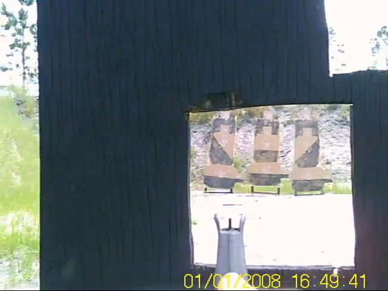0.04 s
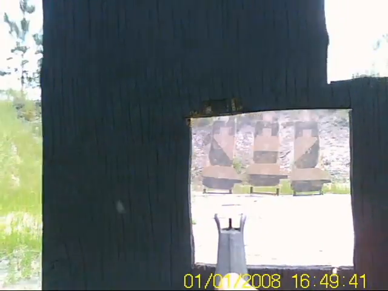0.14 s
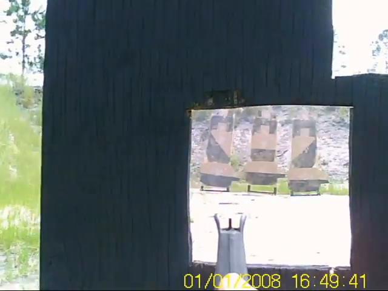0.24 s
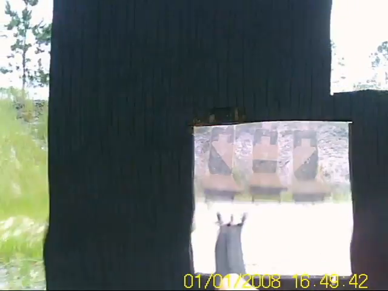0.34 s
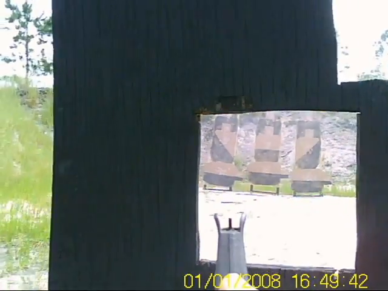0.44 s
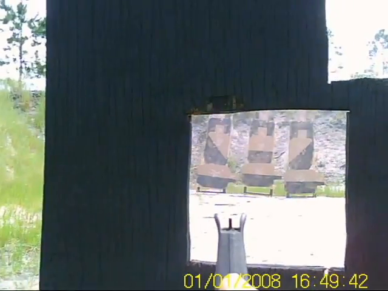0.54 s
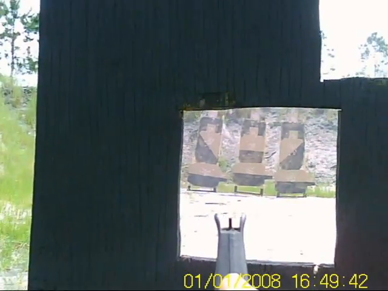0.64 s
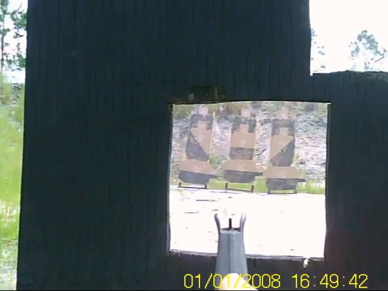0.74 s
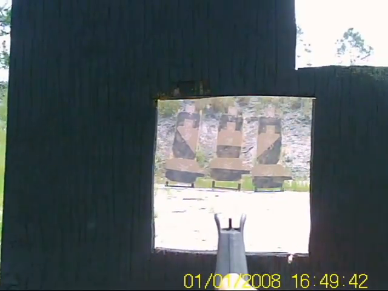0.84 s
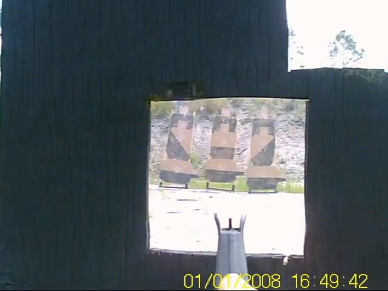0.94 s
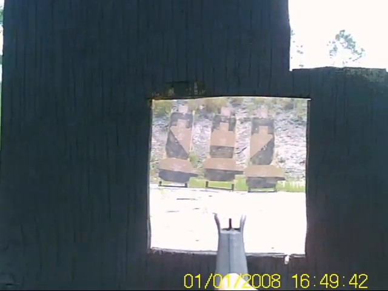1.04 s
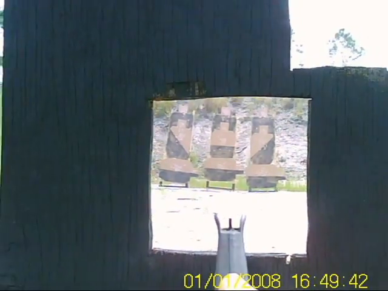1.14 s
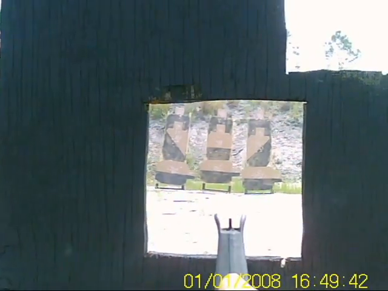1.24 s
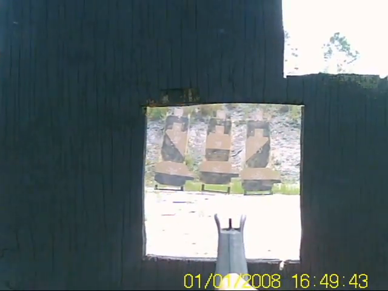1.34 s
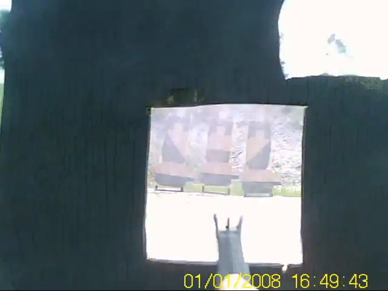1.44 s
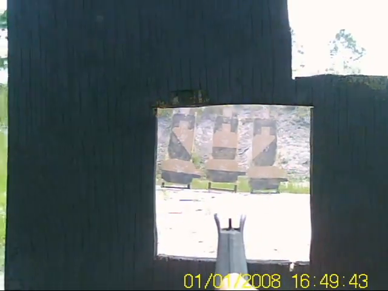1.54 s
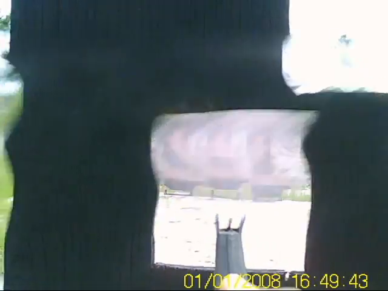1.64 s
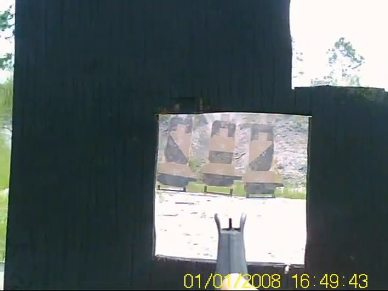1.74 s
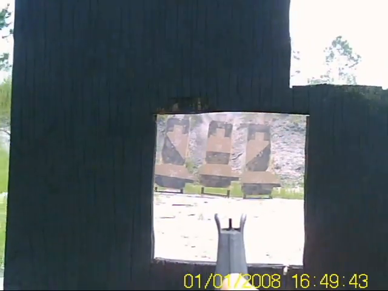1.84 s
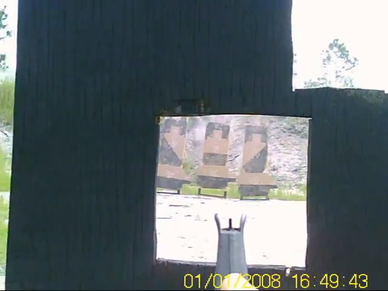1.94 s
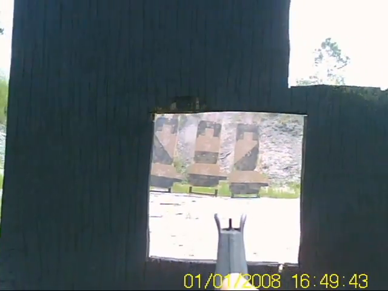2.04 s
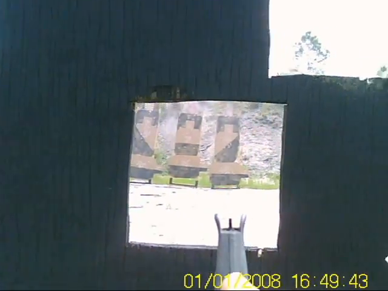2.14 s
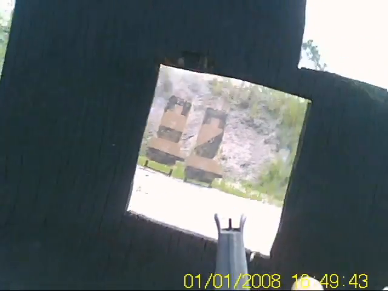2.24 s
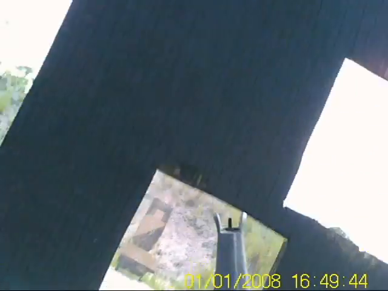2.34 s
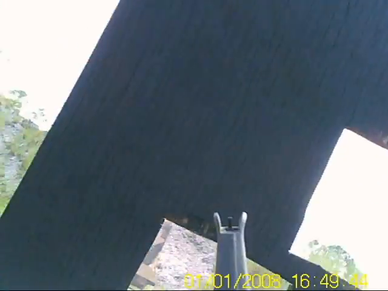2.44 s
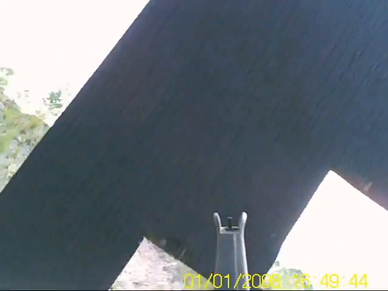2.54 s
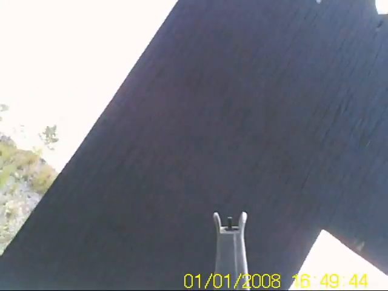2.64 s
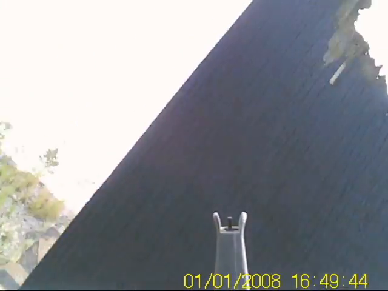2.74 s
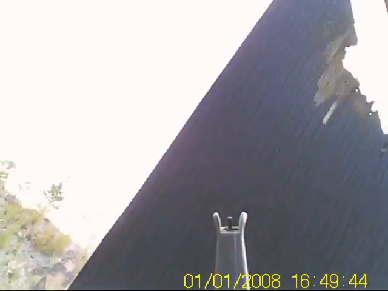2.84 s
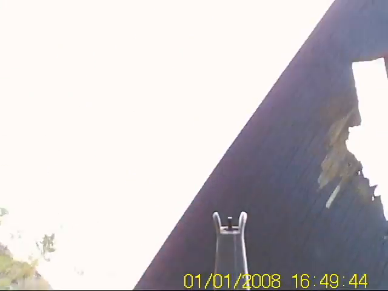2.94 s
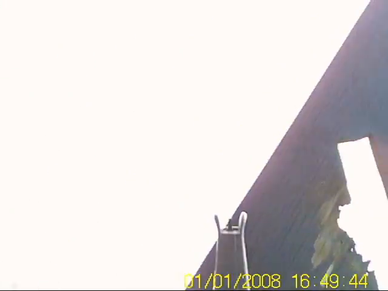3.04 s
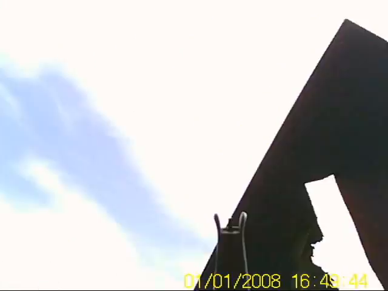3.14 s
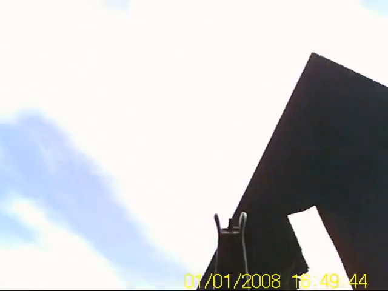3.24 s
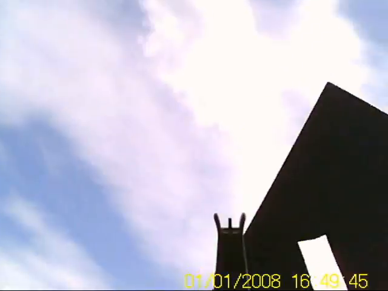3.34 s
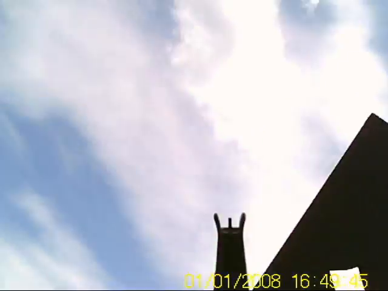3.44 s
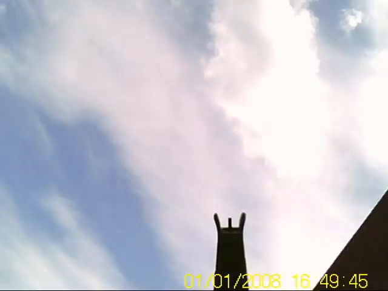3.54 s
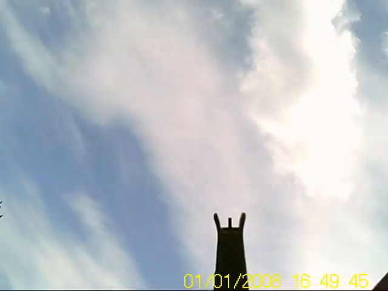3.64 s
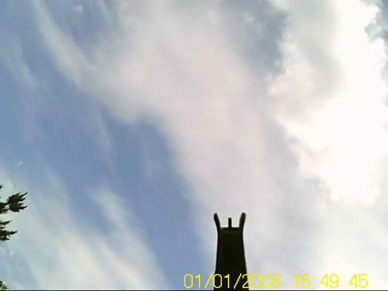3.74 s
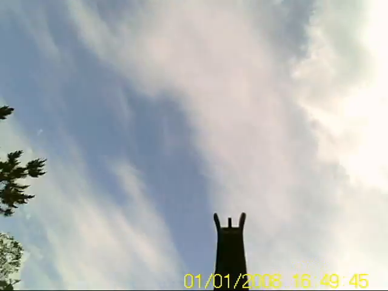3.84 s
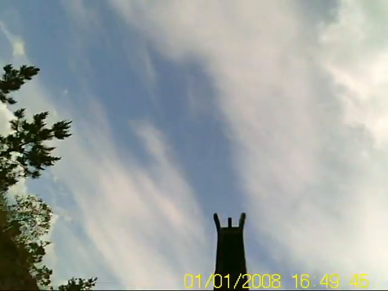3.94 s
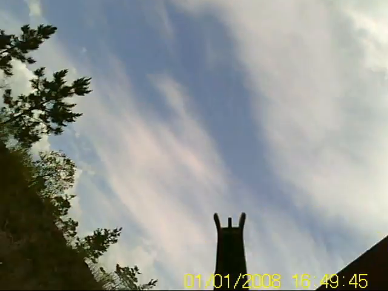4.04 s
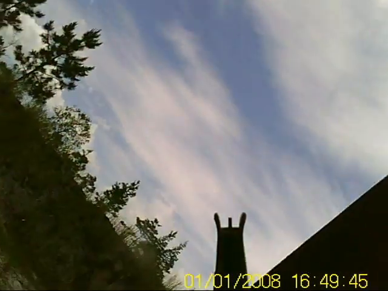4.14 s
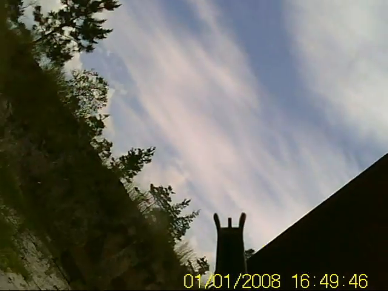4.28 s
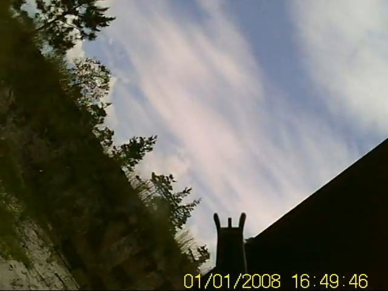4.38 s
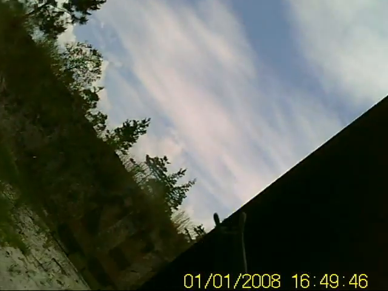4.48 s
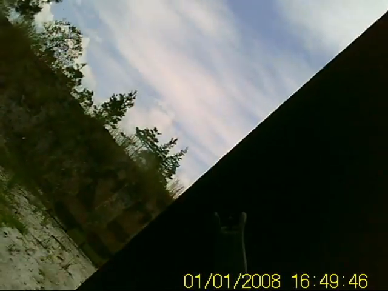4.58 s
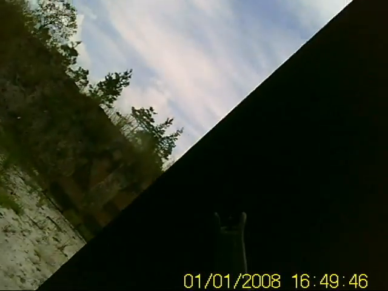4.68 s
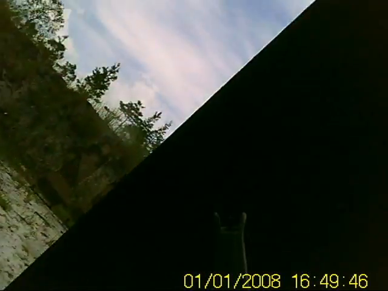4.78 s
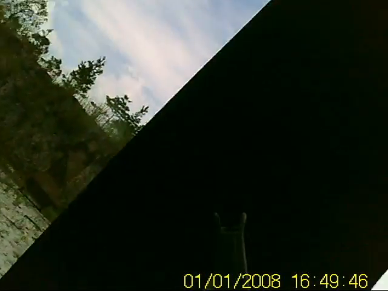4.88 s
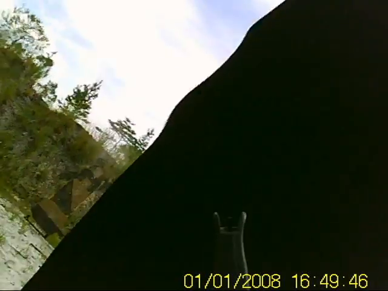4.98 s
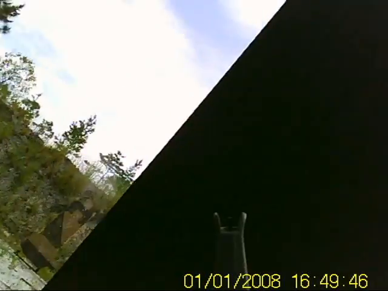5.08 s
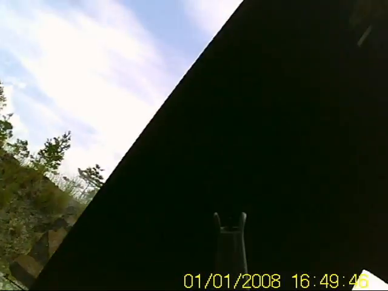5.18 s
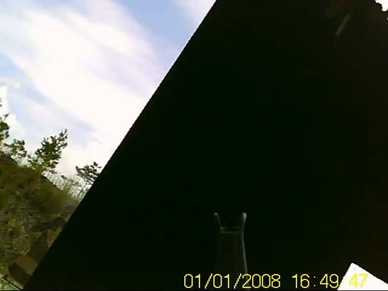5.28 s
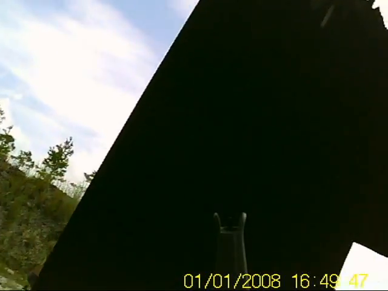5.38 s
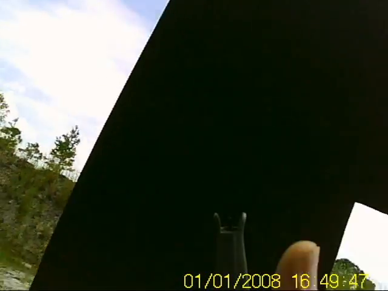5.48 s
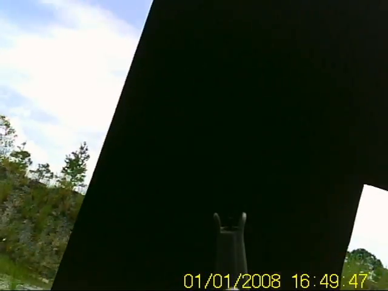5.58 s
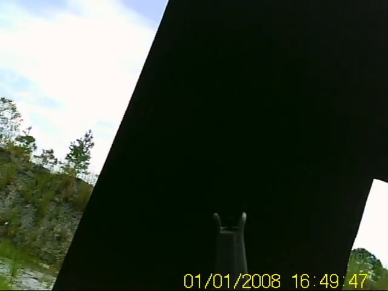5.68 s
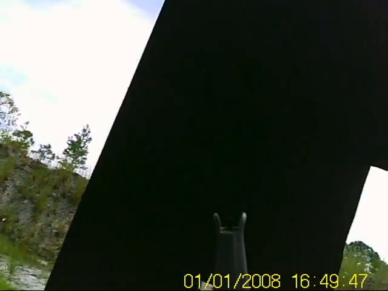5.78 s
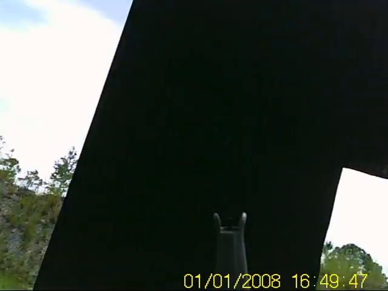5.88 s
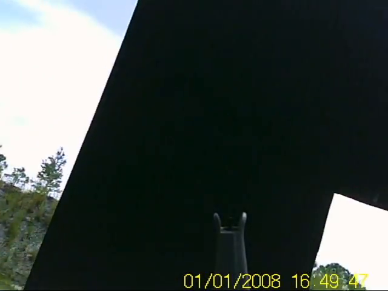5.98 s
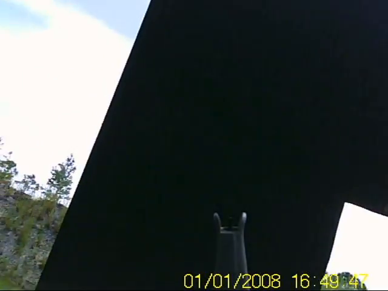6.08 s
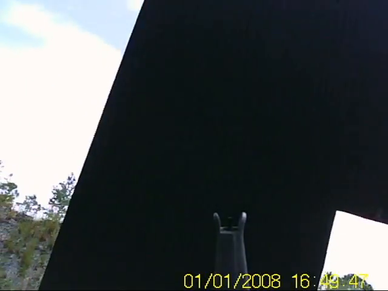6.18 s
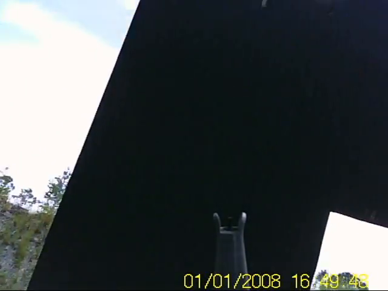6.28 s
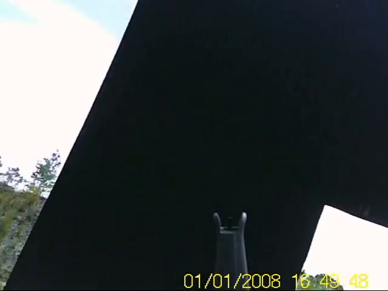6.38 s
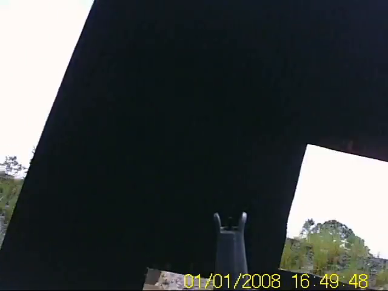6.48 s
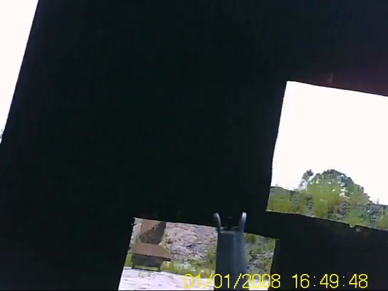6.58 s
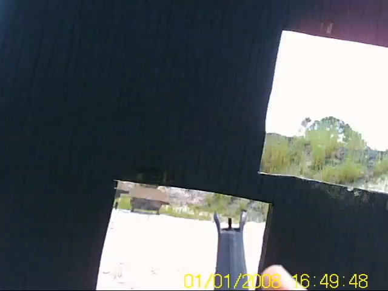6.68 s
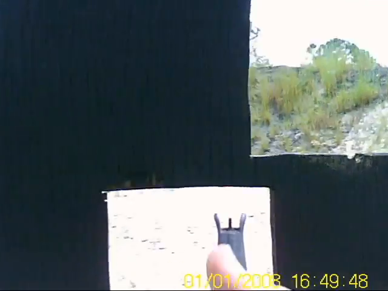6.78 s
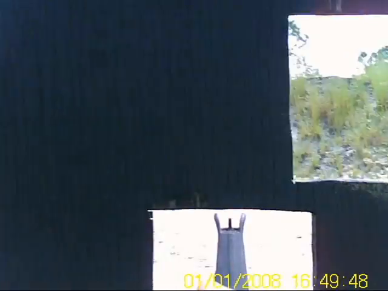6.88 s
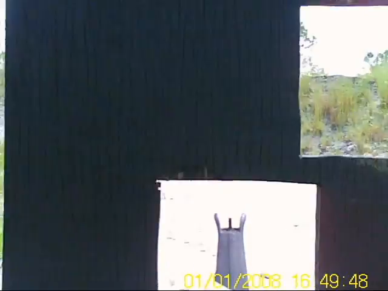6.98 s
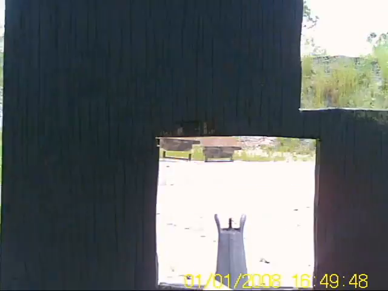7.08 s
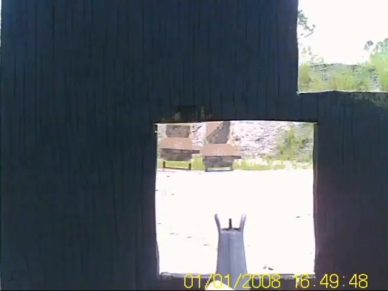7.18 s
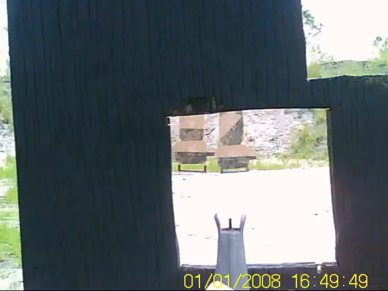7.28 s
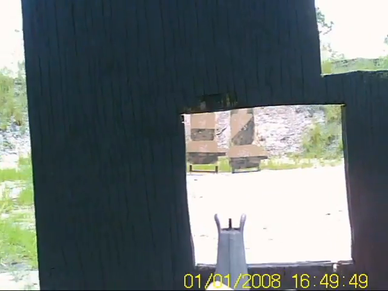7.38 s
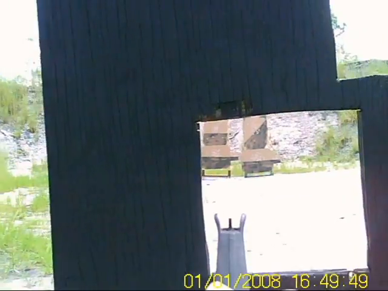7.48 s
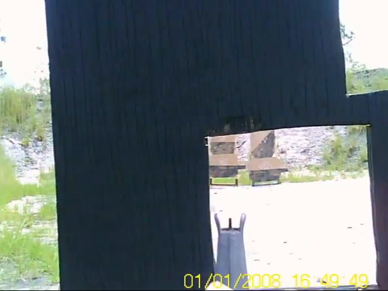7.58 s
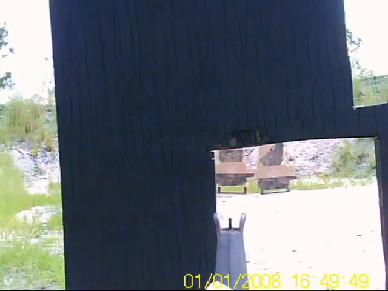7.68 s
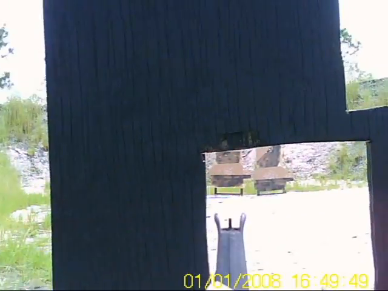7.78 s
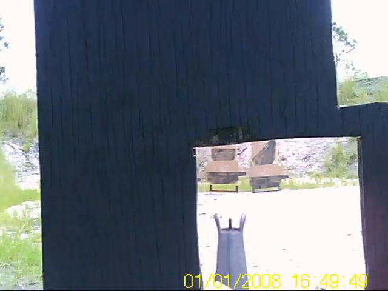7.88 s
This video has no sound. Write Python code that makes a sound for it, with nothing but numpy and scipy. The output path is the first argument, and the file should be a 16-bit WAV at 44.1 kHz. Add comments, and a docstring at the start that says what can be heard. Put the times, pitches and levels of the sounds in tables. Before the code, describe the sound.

A carbine cracks four times in two fast doubles, followed by faint knocks, cloth scuffs, a magazine change, bolt slam and low distant drone.

```python
"""Carbine fired in quick pairs, and a magazine change

A carbine fires two quick pairs of shots through a plywood barricade on an outdoor range, heard by a small
camera fixed to the gun. Each blast is shaped noise driven into asymmetric saturation; the action cycles
right under it as noise bursts exciting resonances. Then the magazine is changed, the bolt slams home with
decaying sine partials, and the gun is handled: knocks, uneven cloth scuffs, ticking fittings over hiss and drone."""
import sys
import numpy as np
from scipy import signal
from scipy.fft import rfft, irfft
from scipy.io import wavfile
from scipy.ndimage import uniform_filter1d

SR = 44100
rng = np.random.default_rng(int(sys.argv[2]) if len(sys.argv) > 2 else 0)


def persist_wave(psi):
    """Save psi, clipped to +-1, as 16-bit WAV."""
    counts = np.round(np.clip(psi, -1, 1) * 32767).astype(np.int16)
    wavfile.write(sys.argv[1], SR, np.atleast_2d(counts).T)


N = 349272
TIME = np.arange(N) / SR
AGE = TIME[:SR * 3 // 4]  # time since the onset of an event
BLOW_AGE = TIME[:SR // 4]

# Shots: onset t/s, relative blast drive into the overload/dB, output level/dB, extra on the first 10 ms/dB,
# relative crack level/dB, recoil thump level/dB, hammer level/dB
SHOT_TABLE = [(0.0619, 27.5, -4.5, 9, 1.5, -17, -15.5), (0.279, 19.5, 2.5, -3, -10, -29.5, -24),
              (1.3877, 25.5, 0, 0.5, -14.5, -33, -19.5), (1.6002, 22.5, 2, -0.5, -9.5, -25.5, -15)]
# Bright resonances of metal parts in contact: f/Hz, width/Hz, level/dB
METAL_TICK_MODES = [(4115, 300, 15.5), (4440, 270, 2.5), (4800, 400, -5.5), (5830, 390, 5.5),
                    (6600, 2200, -22.5), (7900, 1700, -28.5)]
# Low modes of stock and camera mount under a knock from outside: f/Hz, width/Hz, level/dB
STOCK_MODES = [(175, 86, -1), (473, 460, -13), (530, 72, 4.5), (693, 420, 1), (940, 440, -8.5),
               (1159.4, 190, 4.5)]


def undb(db):
    """Level to amplitude: 20 dB is a factor of ten."""
    return 10 ** (np.asarray(db) / 20)


def unit(x):
    """Normalise mean power: scale to rms 1."""
    return x / np.sqrt(np.mean(x ** 2) + 1e-30)


def dose(x):
    """Normalise energy: scale a transient to the energy of 25 ms at rms 1."""
    return x / np.sqrt(np.sum(x ** 2) / (SR / 40) + 1e-30)


def add(track, s, x):
    """Superposition: mix a sound into a track at time s."""
    i = max(int(s * SR), 0)
    track[i:i + len(x)] += x[:N - i]


def fade(t60, age=AGE):
    """Exponential damping: 60 dB of decay in t60 seconds."""
    return np.exp(-np.log(1000) * age / t60)


def cut(x, hz, kind, order=2):
    """Butterworth low-pass or high-pass: maximally flat pass band."""
    return signal.sosfilt(signal.butter(order, hz, kind, fs=SR, output="sos"), x)


def colour(x, points, size=2048):
    """Minimum-phase spectral shaping through (f/Hz, level/dB) points, by way of the cepstrum."""
    hz, db = np.transpose(points)
    bin_hz = np.arange(size // 2 + 1) * SR / size
    gain_db = np.interp(np.log(bin_hz + 1), np.log(hz), db)
    # folding the cepstrum onto positive times makes the filter causal
    cepstrum = irfft(np.log(undb(gain_db)))[:size // 2]
    cepstrum[1:] *= 2
    impulse_response = irfft(np.exp(rfft(cepstrum, size)))
    return signal.fftconvolve(x, impulse_response)[:len(x)]


def resonate(x, modes):
    """Modal superposition: parallel resonances, each (f/Hz, width/Hz, level/dB)."""
    return sum(undb(db) * signal.lfilter(*signal.iirpeak(hz, hz / width, fs=SR), x) for hz, width, db in modes)


def partials(modes, age=AGE):
    """Free vibration: one exponentially damped sine for each mode (f/Hz, level/dB, t60/s)."""
    return np.array([undb(db) * np.sin(2 * np.pi * hz * age) * fade(t60, age) for hz, db, t60 in modes])


def walk(rate):
    """Low-rate random modulation: straight lines between up to 512 Gaussian knots, `rate` per second."""
    knots = rng.standard_normal(512)
    return np.interp(TIME * rate, np.arange(len(knots)), knots)


def overload(x, up, down):
    """Asymmetric saturation: the microphone flattens pressure peaks sooner than troughs."""
    limit = np.where(x > 0, up, down)
    return limit * np.tanh(x / limit)


def gun_body(x):
    """Forced resonance: the strong middle modes of receiver and mount."""
    # f/Hz, width/Hz, level/dB
    body_modes = [(1625.5, 600, -12), (1980, 260, -0.5), (2262, 580, 6), (2500, 61, 3), (2570, 13, -13)]
    return cut(cut(resonate(x, body_modes), 2700, "low", order=5), 1000, "high")


def background():
    """Additive synthesis over shaped noise: electronic hiss and whine, and a low phase-wandering drone."""
    # Spectrum of the electronic hiss: f/Hz, level/dB
    hiss_spectrum = [(30, -8.5), (60, -10), (120, -17), (230, -18.5), (600, -21), (1500, -22.5),
                     (4000, -23.5), (7500, -22.5), (10000, -27.5), (15000, -35.5)]
    # Steady tones of the electronics: f/Hz, rms level/dB
    whine_tones = [(47.6, -83), (1200, -85), (3893, -87), (5599, -85.5), (7400, -87.5), (9599, -91)]
    # Engine tones of the far drone: f/Hz, relative rms level/dB
    engine_tones = [(70, -81), (92.5, -69.5), (117.5, -72.5), (161, -89.5)]
    # Course of the drone, which grows on the whole: t/s, gain/dB
    drone_course = [(0, -18), (4.5, -14.5), (5.5, -5), (6.0, -5), (6.8, -4.5), (7.3, 2.5), (7.92, 1.5)]
    hiss = undb(-75) * unit(colour(rng.standard_normal(N), hiss_spectrum))
    whine = sum(undb(db) * np.sqrt(2) * np.sin(2 * np.pi * hz * TIME) for hz, db in whine_tones)
    drone = sum(undb(db) * np.sqrt(2) * np.sin(2 * np.pi * hz * TIME + 1.3 * walk(7))
                for hz, db in engine_tones)
    return hiss + whine + drone * undb(np.interp(TIME, *np.transpose(drone_course)))


def action_blows():
    """Impact sequence of the mechanism: hammer falls, feed and lock-up of each bolt run, and single blows."""
    # Hammer, a fixed time before each blast: lead t/s, knock level/dB, tick level/dB, time scale t/s
    hammer_fall = (.007, -28, -32, .0011)
    # The bolt runs home after three shots, and more slowly when let go on the new magazine:
    # lock-up t/s, lock-up level/dB, feed level/dB, slowness factor
    bolt_runs = [(0.1300, -12, -17.5, 0.87), (0.3480, -12, -15.5, 1.07), (1.4625, -7.5, -13, 1.01),
                 (6.2328, -3, -2.5, 1.146)]
    # The bolt strips a round, drives it up the ramp, chambers it and bounces: t/s from lock-up before
    # the slowness factor, level over feed/dB, knock level/dB, tick level/dB, time scale t/s
    feed_contacts = [(-.0302, 0.5, -27.5, -28, 0.0054), (-.0148, -1.5, -25.5, -27.5, .0035),
                     (-.0088, 0, -39.5, -22.5, .009), (0.012, -3.5, -38.5, -19.5, 0.0051)]
    # Lock-up: knock level/dB, tick level/dB, time scale t/s
    lock_up = (-18, -17, 0.0017)
    # The buffer rebounds, the bolt locks open, the magazine enters and seats, the catch lets go:
    # t/s, level/dB, knock level/dB, tick level/dB, time scale t/s
    catch_blows = [(0.1685, -21, -22.5, -28, 0.003), (1.6675, -41.5, -1.5, -21, 0.0013),
                   (1.7080, -33, -40, -25.5, 0.0015), (4.8700, -36, -12, -31.5, 0.007),
                   (4.8825, -12.5, -18.5, -30.5, 0.0035), (4.9015, -37, -5, -13.5, 0.0023),
                   (4.9168, -18, -26.5, -32, 0.0023), (4.9245, -3, -18, -27, 0.002),
                   (6.1805, -9, -24.5, -31.5, 0.0024)]
    lead, *hammer = hammer_fall
    rows = [(shot[0] - lead, shot[-1], *hammer) for shot in SHOT_TABLE]
    for s, lock_db, feed_db, slowness in bolt_runs:
        rows.append((s, lock_db, *lock_up))
        rows += [(s + slowness * lag, feed_db + db, *contact) for lag, db, *contact in feed_contacts]
    return rows + list(catch_blows)


def blows(table, low_modes, rattle_db, rattle_t60, ring_db, body_db, top_hz):
    """Impact excitation: a short noise burst rings the gun; loose parts rattle on and the steel sings."""
    # Short ring of the receiver: f/Hz, level/dB, t60/s
    receiver_ring = [(462, -14, 0.21), (961.8, -12.5, 0.1), (1300, -12, .16), (1430, -15.5, 0.53),
                     (1920, -6, 0.15), (2240, -2.5, 0.11), (2380, 0, .16), (2730, 0.5, 0.14),
                     (2572, -5, 0.21), (4450, -15, 0.24), (6000, -19.5, .15)]
    out = np.zeros(N)
    rattle = undb(rattle_db) * fade(rattle_t60, BLOW_AGE)
    rings = partials(receiver_ring, BLOW_AGE)
    for s, db, knock_db, tick_db, time_scale in table:
        contact = rng.standard_normal(len(BLOW_AGE))
        struck = rng.standard_normal(len(receiver_ring))  # each blow finds the modes differently
        progress = BLOW_AGE / time_scale
        # soft contacts build up slowly
        push_rise = 1 - np.exp(-(progress / 0.41) ** 2)
        push = contact * push_rise * (np.exp(-progress * 1.3) + rattle)
        # the whole mass follows later
        heave = contact * (1 - np.exp(-progress)) * (np.exp(-progress / 2.0) + rattle)
        knock = cut(resonate(heave, low_modes), 1100, "low", order=3)
        tick = cut(resonate(push, METAL_TICK_MODES), 3000, "high", order=3)
        tick = cut(tick, top_hz, "low", order=4)
        sound = undb(body_db) * dose(gun_body(push))
        sound = sound + undb(knock_db) * dose(knock) + undb(tick_db) * dose(tick)
        ring = undb(ring_db) * dose(struck @ rings)
        add(out, s, undb(db) * (sound + ring))
    return out


def shots():
    """Blast and reflection: muzzle blast, slap between barricade and ground, roll from berms, all overloaded."""
    # Spectrum of the air blast: f/Hz, level/dB
    blast_spectrum = [(30, -17.5), (70, -12), (200, -8), (400, -8), (900, -11.5), (2200, -11.5),
                      (3200, -16), (5500, -12.5), (9000, -27), (14000, -59)]
    # Hollow of the camera housing that the blast rings: f/Hz, width/Hz, relative level/dB
    housing_modes = [(364, 36, -10), (483.7, 42, 0.5), (789, 25, 6), (932, 140, 4.5), (1086, 40, 5.5),
                     (1380, 580, 1), (1930, 470, 0.5)]
    # Spectrum sent back by ground and berms: f/Hz, level/dB
    field_spectrum = [(30, -17), (70, -1.5), (380, 6), (600, -5), (1900, -6.5), (3200, -20), (5900, -15.5),
                      (14000, -36.5)]
    out = np.zeros(N)
    place = rng.standard_normal(len(AGE))  # the same surfaces shape every shot
    rise = 1 - np.exp(-(AGE / .0022) ** 2)
    front = rise * np.exp(-AGE / 0.0051)
    slap = undb(-20.5) * np.exp(-((AGE - .0262) / .007) ** 2)
    near = undb(-23) * rise * fade(0.16)
    blast_envelope = np.sqrt(front ** 2 + slap ** 2 + near ** 2)
    for s, blast_db, out_db, front_db, crack_db, thump_db, _ in SHOT_TABLE:
        own, gas, scatter, patches = rng.standard_normal((4, len(AGE)))
        air = colour(place + .5 * own, blast_spectrum)
        air = unit(air + undb(5.5) * resonate(air, housing_modes)) * blast_envelope
        crack = unit(cut(cut(gas, 2800, "high"), 11000, "low"))
        crack = undb(crack_db + 2) * crack * rise * np.exp(-AGE / 0.0038)
        # trees and berms return the sound in patches
        patchy = undb(2.5 * unit(uniform_filter1d(patches, 400)))
        roll_envelope = fade(0.53) * (1 - np.exp(-AGE / 0.049))
        roll = undb(-45.5) * unit(colour(scatter, field_spectrum)) * patchy * roll_envelope
        pressure = undb(blast_db - 16.5) * (air + crack + roll)
        heard = overload(pressure, up=.28, down=.62)
        heard = heard * undb(out_db + front_db * np.interp(AGE, [.0098, .0112], [1, 0]))
        heard = cut(cut(heard, 9500, "low"), 130, "high", order=1)
        # recoil reaches the microphone through the mount as one low swing
        thump = undb(thump_db) * dose(np.sin(2 * np.pi * 85 * AGE) * np.exp(-AGE / 0.0027))
        add(out, s, heard - thump)
    return out


def spring():
    """Random impact train into resonances: recoil-spring coils tap the stock tube after the bolt has run."""
    # Chatter: start t/s, end t/s, level at start/dB, level at end/dB
    chatter_runs = [(0.119, 0.26, -44, -53.5), (0.355, 0.508, -39.5, -57.5), (1.479, 1.574, -53.5, -46.5),
                    (6.249, 6.345, -28.5, -42)]
    # What the coils ring, each mode applied twice: f/Hz, width of one pass/Hz, level/dB
    coil_modes = [(483, 89.9, -5.5), (970, 170, -12), (1950, 360, -4), (2220, 160, 0), (2500, 160, -7),
                  (2570, 73, 3.5), (4200, 600, -21), (6020, 200, -17)]
    taps_per_s, tap_decay_s = 170, .002
    out = np.zeros(N)
    for start, end, first_db, last_db in chatter_runs:
        hiss, gaps = rng.standard_normal(len(AGE)), rng.random(len(AGE))
        taps = signal.lfilter([1], [1, -np.exp(-1 / (tap_decay_s * SR))], gaps < taps_per_s / SR)
        push = hiss * (taps + .35)
        # the coil rings and the tube rings again with it, so the bands are steep
        coil = 0
        for hz, width, db in coil_modes:
            mode = [(hz, width, 0)]
            coil = coil + undb(db) * resonate(resonate(push, mode), mode)
        sound = unit(coil) + undb(-17) * unit(resonate(push, METAL_TICK_MODES))
        release = np.exp(-np.maximum(AGE - (end - start), 0) / 0.0081)
        level = undb(np.interp(AGE, [0, end - start], [first_db, last_db]))
        add(out, start, sound * release * level)
    return out


def handling_blows():
    """Contact hardness sets brightness and duration: hard is bright and short; each part settles again."""
    # Clicks and knocks of hands, magazines and gear: t/s, level/dB, hardness 0-1
    touches = [(1.359, -56, 0.4), (1.951, -55, 0), (2.295, -48.5, 0.66), (2.337, -40, 0.81),
               (2.43, -46, 0.1), (2.588, -51.5, 0.04), (2.756, -47, .3), (2.8, -46, 0.42),
               (2.833, -36, 0.7), (2.852, -29.5, 0.68), (3.099, -53, 0), (3.254, -52.5, 0.52),
               (3.328, -49.5, 0), (3.609, -64.5, 0.16), (3.86, -55.5, 0), (4.047, -42, 0.72),
               (4.076, -28, 0.58), (4.114, -23.5, .4), (4.144, -34.5, 0.43), (4.182, -37, 0.32),
               (4.21, -30, 0.65), (4.314, -29, 0.54), (4.422, -32.5, 0.68), (4.504, -25, 0.56),
               (4.58, -34, 0.25), (4.595, -42.5, 0.03), (5.185, -36, 0.47), (5.222, -42.5, 0.12),
               (5.48, -44, 0.24), (5.519, -50.5, 0.11), (5.642, -40, .35), (5.733, -50, 0.62),
               (6.037, -41, 0.76), (6.159, -49.5, 0.1), (6.428, -35.5, 0.61), (6.461, -41, 0.72),
               (6.485, -39.5, 0.9), (6.544, -32.5, 0.85), (6.849, -42, 0.44), (6.915, -48.5, 0.89),
               (6.937, -49, 0.37), (7.002, -35, 0.65), (7.202, -47.5, 0.06)]
    # a hand knocks low and long, steel on steel ticks high and short: (softest, hardest)
    knock_db, tick_db, time_scale_s = (-7.5, -31), (-38, -9), (.0032, 0.0017)
    # second contact: (shortest, longest delay), mean level under the first and its spread
    settle_s, settle_db, settle_spread_db = (0.009, .018), 16, 10

    def between(ends, share):
        """Linear interpolation between two ends."""
        return np.interp(share, [0, 1], ends)

    def touch(hard):
        """Hardness to knock level/dB, tick level/dB and time scale t/s."""
        return between(knock_db, hard), between(tick_db, hard ** 2), between(time_scale_s, hard)

    rows = []
    for s, db, hard in touches:
        delay = between(settle_s, rng.random())
        scatter_db = settle_spread_db * rng.standard_normal()
        rows.append((s, db, *touch(hard)))
        rows.append((s + delay, db - settle_db + scatter_db, *touch(hard / 2)))
    return rows


def movement():
    """Amplitude envelope: a gain that follows how hard the gun is being moved."""
    # How hard sleeves and sling rub: t/s, level/dB
    rub_course = [(1.9, -77), (2.15, -78), (2.42, -62.5), (2.6, -83.5), (2.8, -69.5), (2.95, -85.5),
                  (3.9, -84.5), (4.25, -68), (4.65, -88), (4.87, -65.5), (5.25, -79), (5.52, -68.5),
                  (5.9, -80), (6.2, -67), (6.35, -56.5), (6.68, -70), (7.02, -66), (7.4, -87)]
    return undb(np.interp(TIME, *np.transpose(rub_course), left=-120, right=-120))


def rubbing():
    """Modulated friction noise: cloth scuffs unevenly; dull drag and dry scrape come and go apart."""
    # Spectrum of the cloth: f/Hz, level/dB
    cloth_spectrum = [(100, -18.5), (300, -14), (480, 2.5), (680, 2.5), (1000, -10.5), (1600, -9.5),
                      (2350, -7), (3200, -22.5), (6000, -22), (12000, -48)]
    cloth = colour(rng.standard_normal(N), cloth_spectrum)
    grip_db = 3.5 * walk(22)  # shared by both bands
    drag = cut(cloth, 1000, "low", order=3) * undb(grip_db + 4 * walk(35))
    scrape = cut(cloth, 1000, "high", order=3) * undb(grip_db + 4 * walk(70))
    return unit(drag + scrape) * movement()


def fittings():
    """Random impulses into resonances: sling hardware and loose parts tick while the gun moves."""
    taps_per_s, tap_spread_db, tap_decay_s = 32, 6.5, 0.0036
    level_db = -2  # over the rubbing
    taps = (rng.random(N) < taps_per_s / SR) * undb(tap_spread_db * rng.standard_normal(N))
    envelope = signal.lfilter([1], [1, -np.exp(-1 / (tap_decay_s * SR))], taps)
    push = rng.standard_normal(N) * envelope
    sound = unit(gun_body(push))
    sound = sound + undb(-1.5) * unit(resonate(push, STOCK_MODES))
    sound = sound + undb(-9.5) * unit(resonate(push, METAL_TICK_MODES))
    return undb(level_db) * unit(sound) * movement()


def slams():
    """Hard impact and free vibration: a bright snap, a shove on the microphone, magazine or barrel singing."""
    # Steel seats on steel, first the magazine, then the bolt and its carrier:
    # t/s, snap level/dB, decay t/s, shove gain/dB
    seatings = [(4.9248, -4, 0.00086, -25), (6.233, 2, 0.0013, -12), (6.2355, -7, 0.0024, -4)]
    # Ring of the magazine as it seats: f/Hz, level/dB, t60/s
    magazine_ring = [(99, -34, 0.06), (122, -35, 0.073), (458, -56.5, 0.82), (690, -61.5, 1),
                     (1443, -50, .2), (1630, -49, 0.37), (1840, -53, 0.31), (2649, -52, .2)]
    # Ring of the steel barrel as the bolt closes: f/Hz, level/dB, t60/s
    barrel_ring = [(530, -59, .3), (600, -56.5, 0.75), (1557, -63.5, 3.3), (1615, -64, 0.39),
                   (2261, -58.5, .9), (2666, -47.5, .38), (5860, -54.5, .27), (5900, -56, .45)]
    out = np.zeros(N)
    shove = cut((1 - np.exp(-AGE / 0.0034)) ** 2 * np.exp(-AGE / 0.01), 4.5, "high", order=1)
    for s, snap_db, decay, shove_db in seatings:
        snap = cut(rng.standard_normal(len(AGE)), 4500, "high")
        snap = unit(cut(snap, 8500, "low", order=4)) * np.exp(-AGE / decay)
        snap = snap * np.minimum(AGE / .0002, 1)
        add(out, s, undb(snap_db) * snap - undb(shove_db) * shove)
    add(out, seatings[0][0], partials(magazine_ring).sum(axis=0))
    add(out, seatings[-1][0], partials(barrel_ring, TIME[:2 * SR]).sum(axis=0))
    return out


def scene():
    """Linear superposition of the shots, the working of the gun, its handling and the background."""
    # Low modes of the gun under a blow from its own action: f/Hz, width/Hz, level/dB
    knock_modes = [(108, 67, -3), (200, 270, -13), (327, 320, -10), (524, 23, -11.5), (746, 290, -4.5),
                   (1226, 470, 5)]
    action = blows(action_blows(), knock_modes, rattle_db=-31.0, rattle_t60=0.1,
                   ring_db=-37.5, body_db=-15, top_hz=8400)
    handling = blows(handling_blows(), STOCK_MODES, rattle_db=-26, rattle_t60=0.087,
                     ring_db=-33, body_db=-15.5, top_hz=6900)
    gun = shots() + action + spring() + slams()
    return (gun + handling + rubbing() + fittings() + background())[None]


def record(dry):
    """Band limiting and saturation: the camera dulls the top octave, rounds peaks and sits just below zero."""
    ceiling, top_hz = .76, 15200
    wet = ceiling * np.tanh(cut(dry, 12000, "low", order=5) / ceiling)
    return signal.sosfilt(signal.ellip(8, .2, 90, top_hz, fs=SR, output="sos"), wet) - .004


dry = scene()
out = record(dry)
persist_wave(out)
```